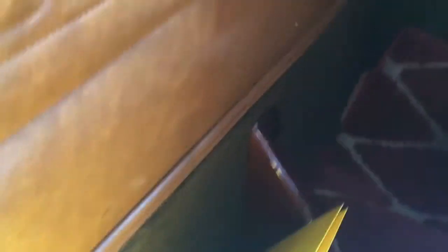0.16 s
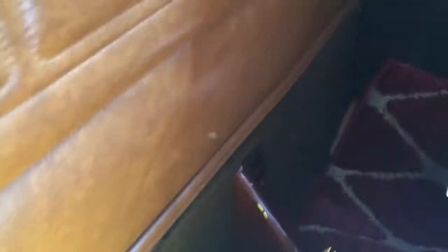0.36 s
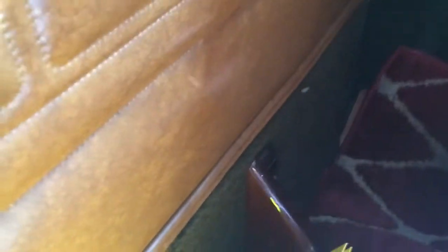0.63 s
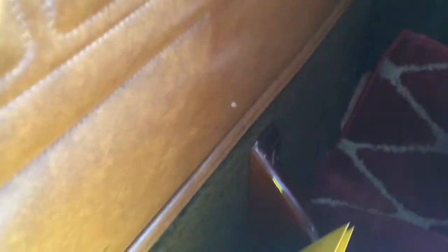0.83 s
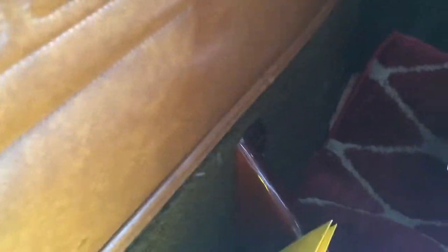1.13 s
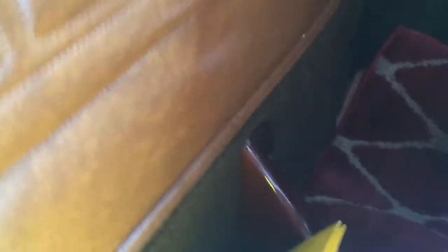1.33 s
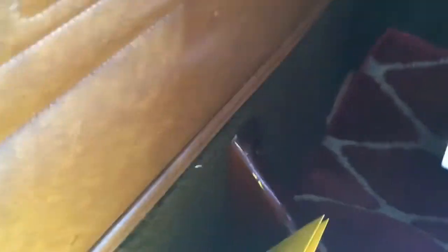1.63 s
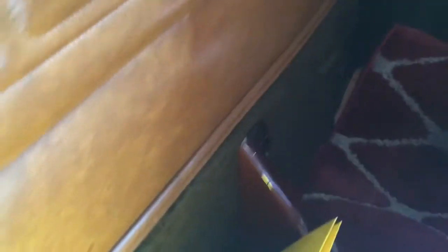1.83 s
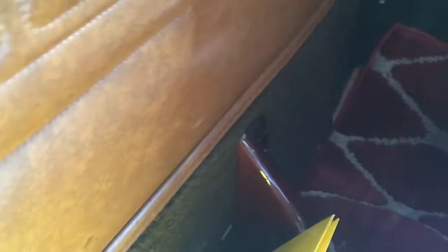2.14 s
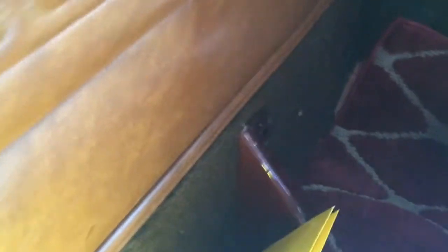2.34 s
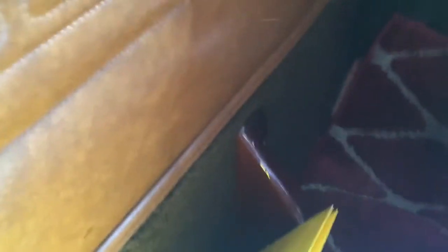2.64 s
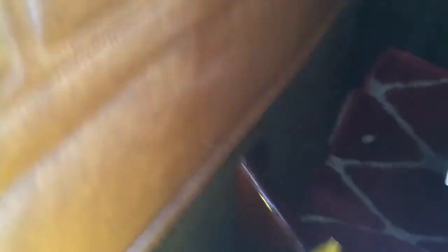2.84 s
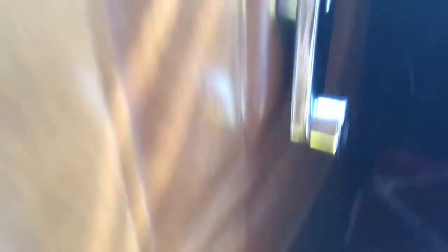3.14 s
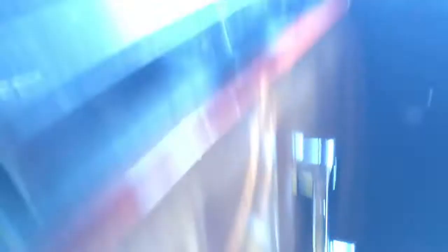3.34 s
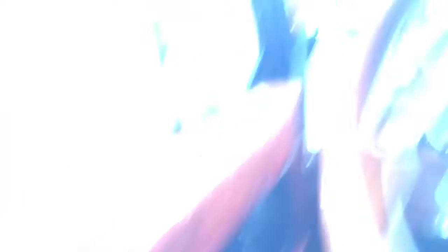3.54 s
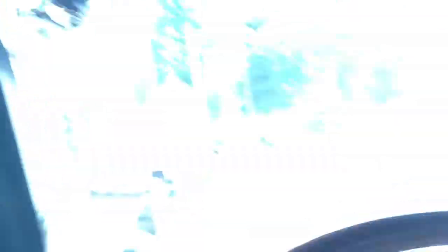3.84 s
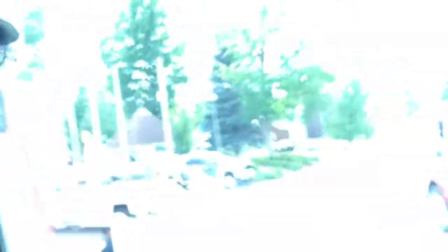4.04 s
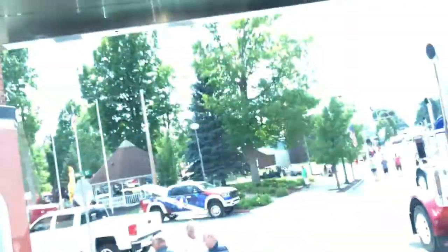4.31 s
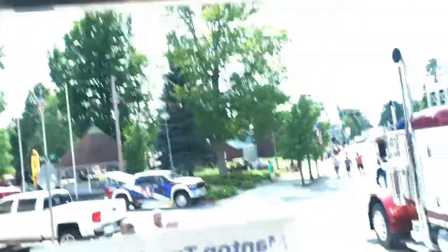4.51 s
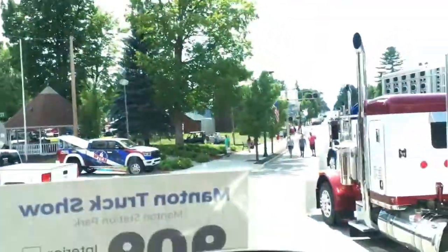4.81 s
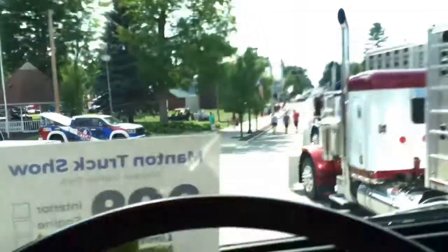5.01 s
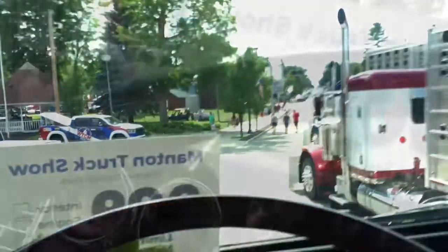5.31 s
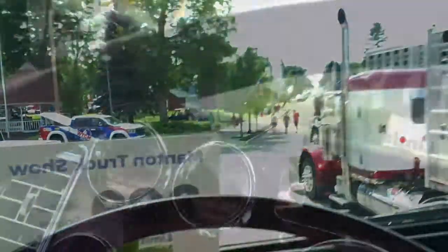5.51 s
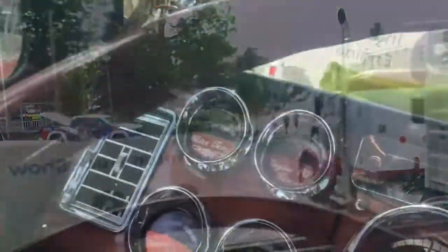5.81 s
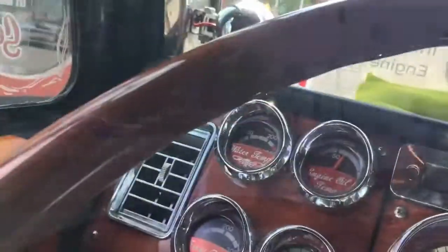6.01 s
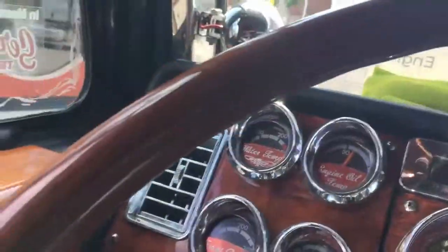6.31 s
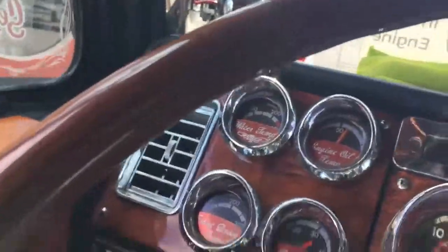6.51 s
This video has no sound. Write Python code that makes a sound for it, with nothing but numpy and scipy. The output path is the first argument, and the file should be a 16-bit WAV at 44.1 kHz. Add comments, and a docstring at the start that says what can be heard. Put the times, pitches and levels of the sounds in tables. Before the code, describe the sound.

Inside a parked truck, a diesel idles while hissing air horns sound a run of blasts, then start again at the very end.

```python
"""Inside the cab of a parked semi truck, a six-cylinder diesel idles. The horn valve lever clicks and air
hisses; then three air horns, diaphragms chopping air into flared pipes, swell six times as the pull is pumped,
and echo off the street. The engine sound dips in level while the chord sounds and returns as it dies away. The
microphone moves from seat to dashboard with a faint handling rustle; a few small knocks follow. At the very end
the valve spits and the horns start again."""
import sys
import numpy as np
from scipy import signal
from scipy.fft import rfft, irfft, next_fast_len
from scipy.io import wavfile

SR = 44100
rng = np.random.default_rng(int(sys.argv[2]) if len(sys.argv) > 2 else 0)


def pcm_store(signal):
    """Save signal as 16-bit PCM."""
    levels = np.round(np.clip(np.atleast_2d(signal), -1, 1) * 32767)
    wavfile.write(sys.argv[1], SR, levels.astype(np.int16).T)


N = 293706
TIME = np.arange(N) / SR


def from_db(db):
    """Decibels to gain."""
    return np.exp(np.asarray(db) * np.log(10) / 20)


def unit_rms(x):
    """Scale to rms 1."""
    return x / np.sqrt(np.mean(x ** 2) + 1e-20)


def hump(start_s, length_s):
    """Smooth rise and fall, height 1."""
    return np.sin(np.pi * np.clip((TIME - start_s) / length_s, 0, 1)) ** 2


def drift(rate_hz, times_s=TIME):
    """Slow random wander, rms 1."""
    step, warmup = 20, 4000
    pole = np.exp(-2 * np.pi * rate_hz * step / SR)
    white = rng.standard_normal(N // step + warmup + 2)
    slow = signal.lfilter([1], [1, -2 * pole, pole * pole], white)[warmup:]
    return np.interp(times_s * SR / step, np.arange(len(slow)), unit_rms(slow))


def noise(spectrum):
    """Shaped noise, steep roll-off beyond the spectrum's ends, rms 1."""
    size = next_fast_len(N)
    log_hz = np.log(np.maximum(np.fft.rfftfreq(size, 1 / SR), 1))
    corner_hz, db = np.transpose(spectrum)
    corners = np.log(corner_hz)
    outside = np.abs(log_hz - np.clip(log_hz, corners[0], corners[-1]))
    gain = from_db(np.interp(log_hz, corners, db) - 50 * outside)
    return unit_rms(irfft(rfft(rng.standard_normal(size)) * gain, size)[:N])


def whistle(hz, width_hz):
    """Noise in one narrow resonance, rms 1."""
    return unit_rms(signal.lfilter(*signal.iirpeak(hz, hz / width_hz, fs=SR), rng.standard_normal(N)))


def exhaust(orders, phase):
    """Exhaust drone: engine orders, each wavering in level."""
    wavers_db = [1.5 * drift(5) for _ in orders]
    return unit_rms(sum(from_db(db + waver_db) * np.cos(k * phase + 2 * np.pi * rng.random())
                        for (k, db), waver_db in zip(orders, wavers_db)))


# Exhaust orders: (multiple of half the firing rate, relative level [dB])
SEAT_ORDERS = [(1, -31), (2, -1), (3, 2), (4, -3), (5, -1.5), (6, -8), (7, -8), (8, -3), (9, -41),
               (10, -7.5), (11, -17), (12, -18)]
DASH_ORDERS = [(2, 2), (3, -7), (4, 3.5), (6, -2.5), (7, -9), (8, -7), (10, -12.5), (12, -27.5),
               (16, -19.5)]
# Engine noise spectra: (frequency [Hz], relative density [dB])
RUMBLE_SPECTRUM = [(30, -14), (42, -13.5), (55, 2.5), (85, -1), (126, -6.5), (150, -10), (190, -13.5),
                   (230, -15.5), (280, -20.5), (400, -34.5)]
SEAT_CLATTER_SPECTRUM = [(150, -26), (250, -4), (483, -9.5), (527, -7), (1040, -14), (1210, -17),
                         (2220, -20), (2470, -28), (3260, -26), (4220, -38.5), (4530, -35), (4940, -42),
                         (15800, -50.5)]
DASH_CLATTER_SPECTRUM = [(150, 1), (205, 4), (250, -20), (277, -7.5), (308, -11), (555, -4), (616, -8),
                         (902, -10), (984, -8.5), (1070, -9), (1540, -13), (2000, -14), (3260, -22.5),
                         (5110, -36.5), (12800, -45), (15800, -46)]


def diesel(firing_hz=34.95, dip_from_s=1.02, dip_to_s=2.93, move_from_s=3.13, move_to_s=3.74):
    """Firings drive the exhaust and pulse the clatter; the timbre shifts from seat to dashboard."""
    phase = np.pi * np.cumsum(firing_hz * (1 + 0.0018 * drift(1.6))) / SR
    dip_attack = 1 - np.exp(-np.maximum(TIME - dip_from_s, 0) / 0.35)
    dip_release = np.exp(-np.maximum(TIME - dip_to_s, 0) / 0.32)
    dip_db = 8 * dip_attack * dip_release
    crossfade_rad = np.interp(TIME, [move_from_s, move_to_s], [0, np.pi / 2])
    seat, dash = np.cos(crossfade_rad), np.sin(crossfade_rad)
    drone = seat * exhaust(SEAT_ORDERS, phase) + dash * exhaust(DASH_ORDERS, phase)
    rumble = from_db(-5.5) * noise(RUMBLE_SPECTRUM)
    bass = from_db(-18 - dip_db) * (from_db(-1.04) * drone + rumble)
    pulse_db = 1.25 * np.cos(2 * phase) + 0.58 * np.cos(4 * phase) + 0.5 * np.cos(2 * phase / 3)
    seat_gain = seat * from_db(-34 - 0.58 * dip_db)
    dash_gain = dash * from_db(-31.5 - 0.55 * (TIME - move_to_s))
    clatter = seat_gain * noise(SEAT_CLATTER_SPECTRUM) + dash_gain * noise(DASH_CLATTER_SPECTRUM)
    gear_whine = from_db(-12.5) * np.hypot(seat_gain, dash_gain) * whistle(hz=925, width_hz=6.8)
    return bass + unit_rms(from_db(pulse_db)) * clatter + gear_whine


# Lever clicks and cab knocks: (time [s], level [dB])
KNOCK_HITS = [(0.46, -42), (0.488, -43), (0.85, -31.5), (3.588, -38), (4.016, -30), (4.497, -37),
              (4.982, -39), (6.197, -44), (6.593, -36)]
# Trim resonances: (frequency [Hz], relative gain [dB], t60 [s])
TRIM_MODES = [(1100, 3, 0.011), (1950, 8.5, 0.012), (3280, 9.5, 0.007), (4500, -2, 0.032),
              (8000, -26, 0.0012)]


def knocks(decay_s=0.0079):
    """Brief dry crunches that barely ring the hard trim."""
    envelope = sum(from_db(db) * (TIME >= s) * np.exp(-np.abs(TIME - s) / decay_s)
                   for s, db in KNOCK_HITS)
    crunch = envelope * rng.standard_normal(N) + 1e-18
    sound = from_db(3) * signal.sosfilt(signal.butter(1, 6000, fs=SR, output="sos"), crunch)
    for hz, db, t60_s in TRIM_MODES:
        radius, angle = from_db(-60 / (t60_s * SR)), 2 * np.pi * hz / SR
        ring = signal.lfilter([0, np.sin(angle)], [1, -2 * radius * np.cos(angle), radius ** 2], crunch)
        sound += from_db(db - 26) * ring
    return cab_reflections(sound, t60_s=0.045, wet_db=-7)


def cab_reflections(x, t60_s, wet_db):
    """Add dense short reflections from glass and panels."""
    age_s = TIME[:SR // 3]
    tail = rng.standard_normal(len(age_s)) * from_db(-60 * age_s / t60_s)
    return x + from_db(wet_db) * signal.fftconvolve(x, tail / np.linalg.norm(tail))[:N]


# Valve pulls, base values: (start [s], rise [s], length [s], strength [dB], pitch sag [%])
VALVE_PULLS = [(0.987, 0.039, 0.2405, -0.1, 1.35), (1.373, 0.081, .364, 0.13, 1.4),
               (1.83, 0.059, 0.287, -1.5, 1.2), (2.16, 0.05, 0.21, -3.5, 0.695),
               (2.383, 0.049, 0.18, -4, 0.447), (2.581, 0.056, 0.15, -3.5, .5),
               (6.625, 0.032, .27, 0.65, 1.42)]


def swell(db, follow, lag_s, rise_scale, linger_s, sag_db_per_s, release_db_per_s):
    """Envelope over the pulls: builds, sags with the air supply, dies on release."""
    power = np.zeros(N)
    for start_s, rise_s, length_s, strength_db, _ in VALVE_PULLS:
        near = (TIME > start_s - 0.1) & (TIME < start_s + 1.2)
        age_s = np.maximum(TIME[near] - start_s - lag_s, 0)
        attack = 1 - np.exp(-(age_s / (rise_s * rise_scale)) ** 2)
        fall_db = sag_db_per_s * age_s + release_db_per_s * np.maximum(age_s - length_s - linger_s, 0)
        power[near] += (attack * from_db(db + follow * strength_db - fall_db)) ** 2
    return np.sqrt(power)


# Air spits ahead of each pull: (start [s], length [s], hiss level [dB], whistle level [dB])
VALVE_SPITS = [(0.907, 0.12, -32.5, -31.5), (1.33, 0.12, -45, -30), (1.802, 0.067, -48, -29.5),
               (2.123, .12, -49, -46), (2.31, 0.16, -60, -35), (2.51, 0.17, -59, -40),
               (6.564, 0.066, -34, -48)]
# Valve seat whistles: (frequency [Hz], width [Hz], relative level [dB])
WHISTLE_BANDS = [(12040, 160, -11), (14300, 280, -11)]
# Air hiss: (frequency [Hz], relative density [dB])
HISS_SPECTRUM = [(4000, -37), (6100, -1.5), (7200, -4.5), (10400, -6), (12200, -3), (13000, -2),
                 (14000, -4), (15800, -7)]


def valve():
    """Air spits and whistles as the valve cracks open, then hisses through it."""
    flow = swell(db=-34, follow=1.1, lag_s=0.011, rise_scale=1.26, linger_s=-0.013,
                 sag_db_per_s=11, release_db_per_s=170)
    spits = sum(from_db(db) * hump(s, length_s) for s, length_s, db, _ in VALVE_SPITS)
    squeals = sum(from_db(db) * hump(s, length_s) for s, length_s, _, db in VALVE_SPITS)
    whistles = sum(from_db(db + 7.9 * drift(12)) * whistle(hz, width_hz)
                   for hz, width_hz, db in WHISTLE_BANDS)
    hiss = from_db(2 * drift(30) - 2.5) * noise(HISS_SPECTRUM)
    return (flow + spits) * hiss + (from_db(-8) * flow + squeals) * whistles


# Horn starts from rest: (time [s], level [dB])
ONSET_BARKS = [(0.986, -12), (6.633, -14)]


def bark(lag_s, length_s, gain_db):
    """Envelope of a diaphragm's overshoot on its first swings."""
    return sum(from_db(db + gain_db) * hump(s + lag_s, length_s) for s, db in ONSET_BARKS)


def horn(hz, partials, live, force, flutter_rad, split_hz=2800, brass_hz=6000):
    """A diaphragm chops air into a flared pipe. Returns phase, blare (below the split), edge (above)."""
    phase = 2 * np.pi * np.cumsum(hz * (1 + 0.0013 * drift(25))) / SR
    phase += flutter_rad * force ** 2.3 * drift(47)   # diaphragm flutters when blown hard
    pitch_hz = np.median(hz[live])
    multiples, levels_db = np.transpose(partials)
    overtones = []
    for k in range(2, int(12500 / pitch_hz)):
        rolloff_db = np.mean(levels_db[-3:]) - 11 * np.log2(k / multiples[-1])
        brass_db = 3 * np.exp(-(np.log2(k * pitch_hz / brass_hz) / 0.18) ** 2)
        db = np.interp(k, multiples, levels_db, right=rolloff_db + brass_db)
        sway_db = min(1.2 + 0.33 * k, 4.4) * drift(9, TIME[live])
        overtones.append(from_db(db + sway_db) * np.sin(k * phase[live] + 2 * np.pi * rng.random()))
    split = int(split_hz / pitch_hz) - 1
    blare, edge = np.zeros((2, N))
    blare[live], edge[live] = sum(overtones[:split]), sum(overtones[split:])
    return phase, blare, edge


# Horn overtones, common scale: (multiple, relative level [dB])
LOW_OVERTONES = [(2, -5.5), (3, -7), (4, -3.5), (5, -8), (6, -10.5), (7, -16.5), (8, -13), (9, -21),
                 (10, -5), (11, -17.5), (12, -9), (13, -20), (14, -15), (15, -19.5), (16, -24), (17, -21),
                 (18, -20.5), (19, -19), (20, -16), (21, -20.5), (22, -25)]
MID_OVERTONES = [(2, -1.5), (3, 0), (4, -3.5), (5, -3.5), (6, -12), (7, -14), (8, -23), (9, -11.5),
                 (10, -22), (11, -16), (12, -15.5), (13, -19.5)]
HIGH_OVERTONES = [(2, 2), (3, -8), (4, -7.5), (5, -17), (6, -24), (7, -17), (8, -15), (9, -21), (10, -39),
                  (11, -13)]
# Air rasp: (frequency [Hz], relative density [dB])
RASP_SPECTRUM = [(300, 4), (450, -2.5), (800, -4), (1300, -7), (2300, -5), (3500, -9), (6000, -20.5),
                 (10000, -23), (15500, -41)]
# Middle horn moaning on as pressure drains: (start [s], length [s], level [dB])
MID_MOANS = [(1.22, 0.31, -19), (1.733, 0.2, -22), (2.673, 0.27, -21.5)]


def air_horns(low_hz=310.9, mid_hz=383.3, high_hz=512.3, recovery_s=0.075):
    """Three horns on one air line: each pull swells them and pushes them flat."""
    sag = sum(percent / 100 * hump(s, length_s + recovery_s)
              for s, _, length_s, _, percent in VALVE_PULLS)
    # Low horn starts choked (flat, weak fundamental, more blare), then locks in.
    choke = np.interp(TIME, [1.21, 1.29], [1, 0])
    low = swell(db=-19.5, follow=0.78, lag_s=0.011, rise_scale=0.47, linger_s=0.0048,
                sag_db_per_s=4, release_db_per_s=96)
    mid = swell(db=-8.5, follow=1.83, lag_s=0.047, rise_scale=1.12, linger_s=-0.039,
                sag_db_per_s=45, release_db_per_s=114)
    high = swell(db=-9.5, follow=0.96, lag_s=0.012, rise_scale=1.24, linger_s=-0.013,
                 sag_db_per_s=34, release_db_per_s=70)
    blare_gain = swell(db=-13, follow=1.17, lag_s=0.00071, rise_scale=0.95, linger_s=0.00097,
                       sag_db_per_s=25.5, release_db_per_s=100)
    edge_gain = swell(db=-24.5, follow=1, lag_s=0.0047, rise_scale=1.63, linger_s=0.0044,
                      sag_db_per_s=15, release_db_per_s=126)
    moan = sum(from_db(db) * hump(s, length_s) for s, length_s, db in MID_MOANS)
    low *= from_db(-8 * choke)
    mid = np.hypot(mid, moan) + bark(lag_s=0.0095, length_s=0.065, gain_db=1.5)
    high += bark(lag_s=-0.0042, length_s=0.048, gain_db=1)

    force = blare_gain / blare_gain.max()
    live = blare_gain > from_db(-70)
    phases, blares, edges = zip(
        horn(low_hz * (1 - 0.25 * sag) - 10.3 * choke, LOW_OVERTONES, live, force, flutter_rad=0.02),
        horn(mid_hz * (1 - sag), MID_OVERTONES, live, force, flutter_rad=0.035),
        horn(high_hz * (1 - sag), HIGH_OVERTONES, live, force, flutter_rad=0.19))
    chord = np.sqrt(2) * sum(gain * np.sin(phase) for gain, phase in zip((low, mid, high), phases))
    moan_octave = np.sqrt(2) * from_db(-12) * moan * np.sin(2 * phases[1])
    overtones = from_db(3.5 * choke) * blares[0] + blares[1] + blares[2]
    blare = blare_gain * overtones / np.std(overtones[live])
    edge = edge_gain * from_db(-1.64) * sum(edges) / np.std(sum(edges)[live])
    puffs = unit_rms(sum(np.exp(0.23 * np.cos(phase)) for phase in phases))   # one air puff per cycle
    rasp = edge_gain * from_db(1.5) * force ** 0.88 * puffs * noise(RASP_SPECTRUM)
    return chord + moan_octave + blare + edge + rasp


def street_echo(x, delay_s=0.21, gain_db=-23, cutoff_hz=4800):
    """Add one dull echo from across the street."""
    dull = signal.sosfilt(signal.butter(1, cutoff_hz, fs=SR, output="sos"), x + 1e-18)
    return x + from_db(gain_db) * np.interp(TIME - delay_s, TIME, dull, left=0)


# Handling rustles: (centre [s], length [s], level [dB])
HANDLING_RUSTLES = [(3.5, 1, -55), (4.04, 0.29, -54), (4.536, 0.26, -61)]
# Handling friction: (frequency [Hz], relative density [dB])
RUSTLE_SPECTRUM = [(2500, -4), (5500, -3), (9000, -9), (15800, -10)]


def rustle():
    """Faint handling rustle in uneven strokes as the microphone moves."""
    strokes = sum(from_db(db) * hump(s - length_s / 2, length_s) for s, length_s, db in HANDLING_RUSTLES)
    return strokes * from_db(6 * drift(23)) * noise(RUSTLE_SPECTRUM)


def scene():
    """Mono mix in the cab."""
    horns = street_echo(air_horns())
    air = valve()
    return (diesel() + knocks() + air + horns + rustle())[None]


def record(dry):
    """High-pass at 28.5 Hz, soft clip, low-pass at 15850 Hz."""
    trimmed = signal.sosfilt(signal.butter(12, 28.5, "high", fs=SR, output="sos"), dry)
    rounded = trimmed / (1 + trimmed ** 8) ** (1 / 8)
    return signal.sosfilt(signal.ellip(12, 0.1, 90, 15850, fs=SR, output="sos"), rounded)


dry = scene()
out = record(dry)
pcm_store(out)
```